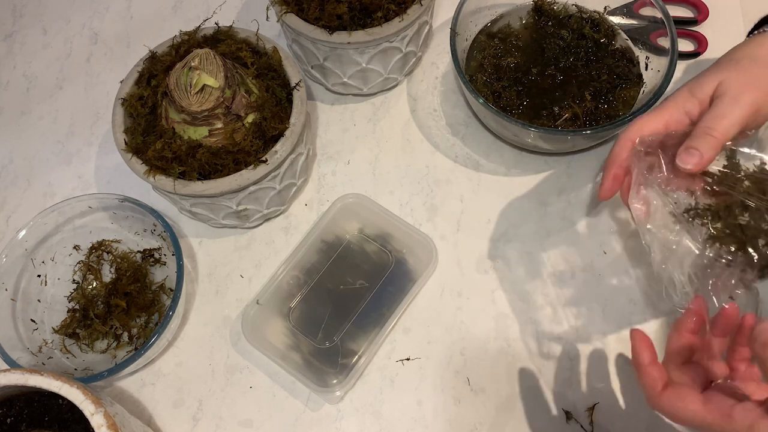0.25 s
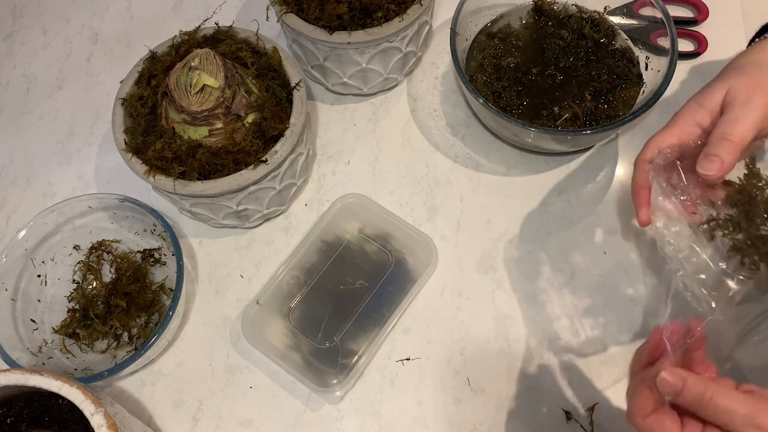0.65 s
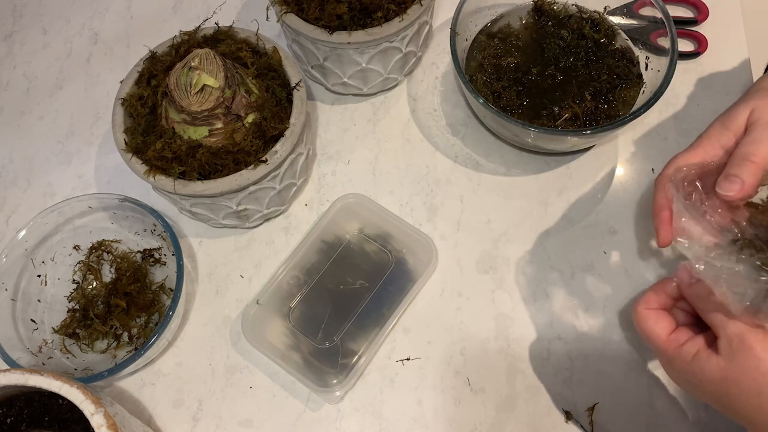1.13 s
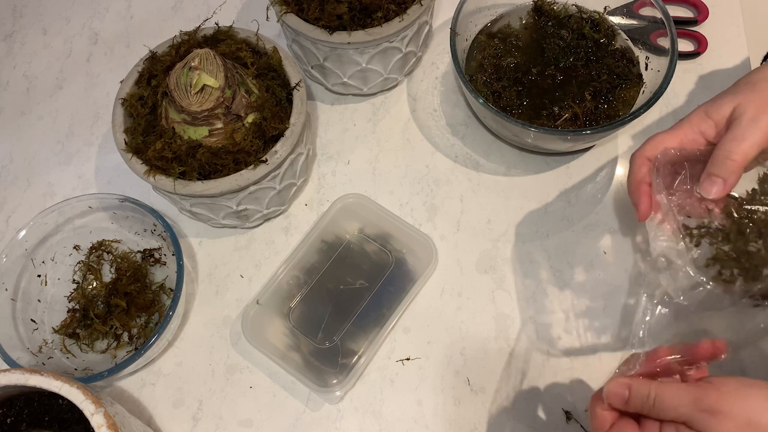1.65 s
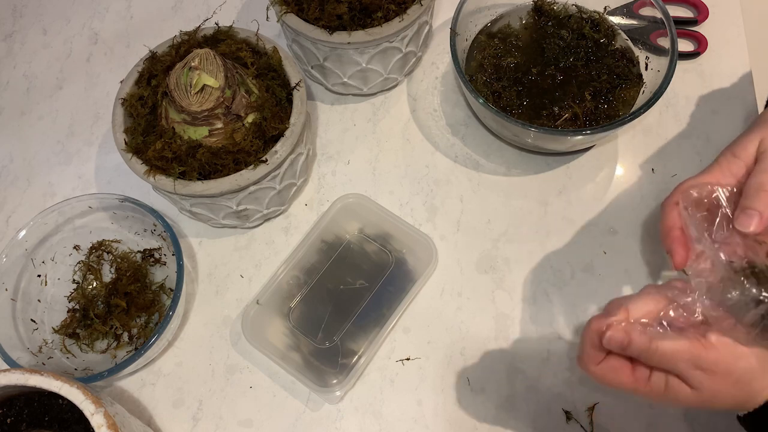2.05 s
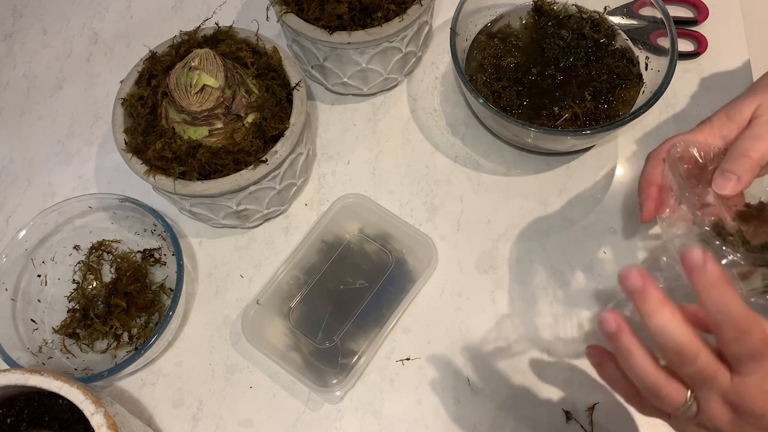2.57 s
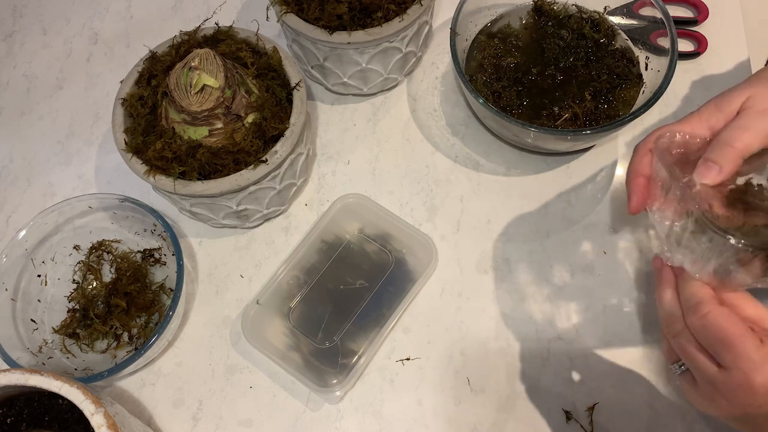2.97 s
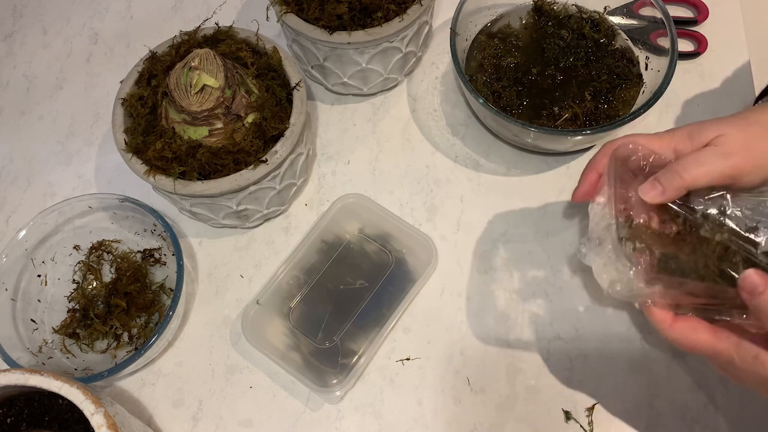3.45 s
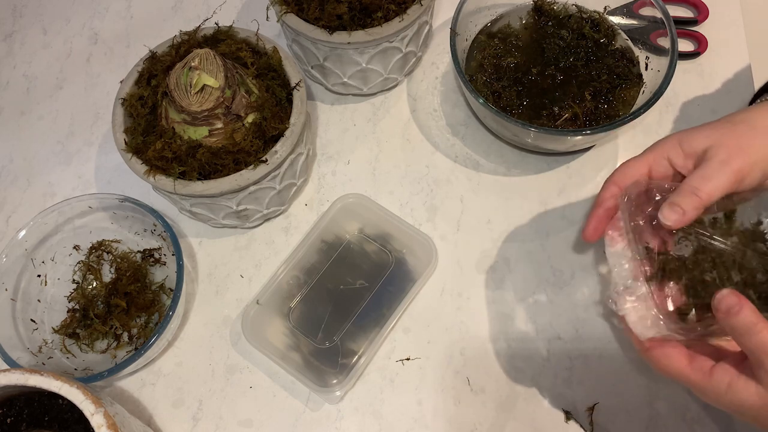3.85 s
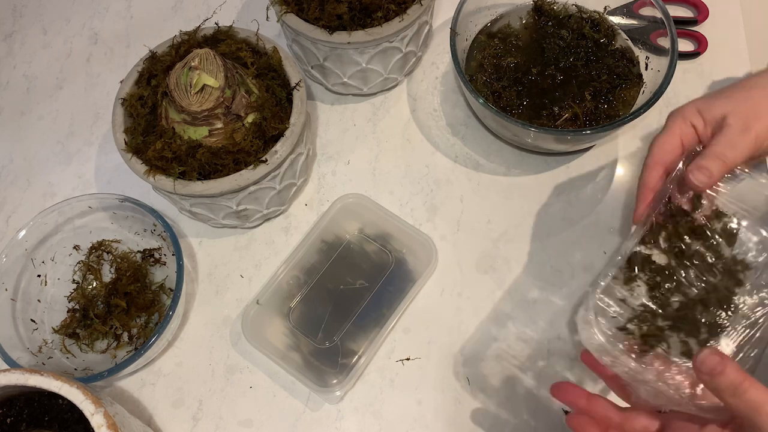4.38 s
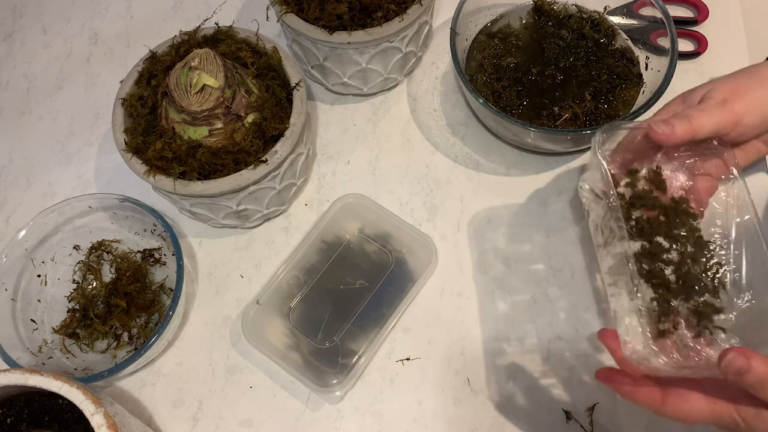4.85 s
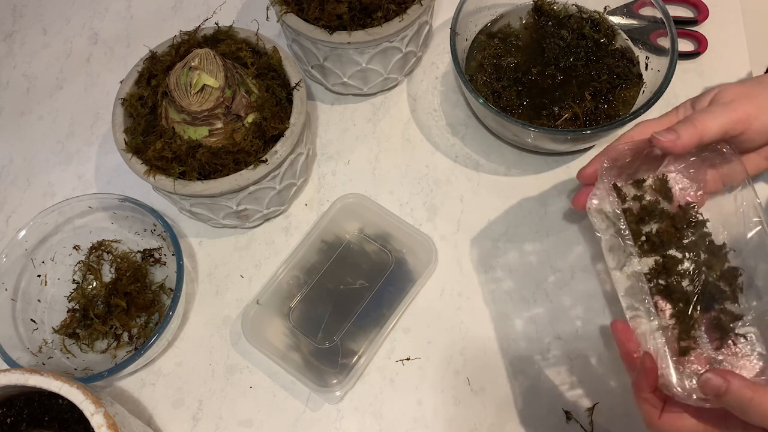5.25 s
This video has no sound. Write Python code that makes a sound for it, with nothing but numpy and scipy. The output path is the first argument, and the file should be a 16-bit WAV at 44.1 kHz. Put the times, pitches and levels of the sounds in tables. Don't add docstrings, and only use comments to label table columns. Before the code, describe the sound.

Hands stretch thin plastic film over a light plastic tub on a hard worktop. Fine crisp rustling comes in irregular tugs, with small snaps and ticks and an occasional pop. Firmer pops arrive near two seconds, then a brief lull around two and a half. From three and a half seconds loud hollow pops burst out in clusters to the end. Close microphone, small reflective room, faint low rumble.

```python
import sys
import numpy as np
from scipy import signal
from scipy.fft import rfft, irfft
from scipy.io import wavfile
from scipy.ndimage import uniform_filter1d

SR = 44100
rng = np.random.default_rng(int(sys.argv[2]) if len(sys.argv) > 2 else 0)


def gain_from_db(level_db):
    decades = np.asarray(level_db, float) / 20
    return 10 ** decades


def persist_wave(psi):
    counts = np.round(np.clip(psi, -1, 1) * 32767).astype(np.int16)
    wavfile.write(sys.argv[1], SR, np.atleast_2d(counts).T)


N = 243431

# start_s, peak_db, main_hz, second_hz, treble_slope_db_per_octave
HELD_POPS = [
    (0.995, -20, 5600, 1460, 1.5),
    (1.894, -20, 1450, 550, -3.5),
    (2.087, -15, 2110, 970, -3),
    (3.921, -14, 1660, 1150, 0.5),
    (4.242, -11, 763, 1560, -18.5),
    (4.344, -4, 2050, 3980, -1.8),
    (4.379, -8, 1450, 4300, 4),
    (4.573, -16, 1370, 2100, -11),
    (5.215, -6, 5200, 4080, 5),
    (5.378, -3, 5270, 780, 3),
]
FREE_POPS = [
    (0.11, -17.5, 1360, 5740, 5),
    (2.139, -14, 770, 1430, -27),
    (3.486, -1, 3350, 1870, -1.5),
    (4.846, -3, 1150, 2990, -0.5),
    (5.17, -5.5, 2670, 1680, 0),
]
# pitch_hz, width_hz, level_db
SHELL_MODES = [(540, 36, -4.5), (760, 22, -5.5), (2430, 30, 0), (3430, 200, -2), (4070, 35, -6),
               (4800, 40, -9), (5600, 35, -8.5), (7450, 40, -17)]
# start_s, peak_db, wall_hz, wall_db, treble_slope_db_per_octave
WALL_SNAPS = [(0.07, -36, 810, -19, 0), (0.124, -39, 1390, -8, 0), (0.622, -38.5, 354, -17.5, 0.6),
              (0.74, -39.5, 765, -14.5, 0.5), (1.352, -33, 925, -14, 3), (1.897, -25.5, 640, -9, -19),
              (2.151, -28, 734, -10.5, -19), (2.308, -39, 1510, -12.5, 1.5), (2.355, -47, 1420, -5.5, 11),
              (2.958, -45.5, 396, -10, 4), (3.161, -49, 1150, -5.5, 7.5), (3.227, -50, 720, 6, -1),
              (3.75, -41.5, 1120, -4.5, 6), (4.4, -37, 1180, 0, -1), (4.871, -16, 1083, -9.5, -1),
              (5.025, -38, 760, -5, -4), (3.489, -36, 700, 4, -8), (4.346, -33, 760, 4, -4),
              (5.287, -31.5, 780, -8.5, -7), (5.395, -31.5, 1840, -10, 4)]
# start_s, peak_db, crease_hz, treble_slope_db_per_octave
FOLD_SNAPS = [(0.135, -36.5, 5300, -2.5), (0.868, -39, 5960, 5.5), (0.944, -42, 5170, 0),
              (0.973, -40, 4370, 1), (1.016, -25.5, 4130, 0), (1.366, -39.5, 5050, 6),
              (1.457, -34, 2580, -3.5), (1.719, -54, 3750, -2), (2.642, -45.5, 3570, -5),
              (2.808, -41.5, 3600, -2), (2.864, -28, 6040, 5.5), (3.426, -45, 1790, -8.5),
              (3.723, -26, 3600, -5.5), (3.861, -29.5, 2470, 0.6), (5.184, -36, 1900, -13),
              (5.352, -20, 2240, -0.8), (5.403, -22, 6970, 4)]
# pitch_hz, level_db
CRACK_TONE = [(150, -31.5), (400, -7), (1000, 8.5), (3000, 4.5), (6000, 6), (10000, -0.5), (16000, -5.5)]
# pitch_hz, width_hz, level_db
TUB_MODES = [(292, 17, -15), (510, 104, 11.5), (700, 19, -20.5), (3490, 39, -9)]
# start_s, peak_db
FILM_TICKS = [(0.4735, -44), (0.4964, -45), (0.898, -36), (1.0894, -40), (1.155, -35.5), (1.2027, -35),
              (1.3244, -40), (1.4204, -35), (1.566, -34), (1.6924, -40), (1.8425, -35), (2.4277, -29),
              (2.9444, -32), (2.9944, -37), (3.345, -35), (4.231, -32), (4.306, -25), (4.4994, -38)]
# start_s, peak_db, pitch_hz
BASE_THUDS = [(0.653, -51, 388), (1.05, -52, 423), (1.39, -49.5, 322), (2.139, -51.5, 410),
              (3.737, -45, 274), (4.246, -32, 323), (4.848, -32.5, 316), (5.172, -33, 420)]
# tightest_s, build_up_s, fizz_db, crease_db
FILM_TUGS = [(0.01, 0.062, -58, -63.5), (.13, 0.055, -47.5, -62), (.41, 0.45, -67, -61),
             (.485, 0.14, -45, -57.5), (0.599, 0.12, -51.5, -63.5), (1.24, .2, -78, -73),
             (.87, 0.11, -48, -52.5), (1.02, 0.26, -43, -48), (1.09, 0.27, -48, -59),
             (1.358, 0.036, -45, -45), (1.455, 0.1, -40, -57.5), (1.58, 0.24, -52, -54.5),
             (1.7, 0.18, -48, -56.5), (2.1, 0.14, -55, -51), (2.37, 0.88, -58, -55),
             (2.645, .004, -48, -57.5), (2.74, 0.095, -48.5, -61), (2.82, 0.045, -51, -68),
             (2.87, 0.073, -37.5, -49.5), (3.19, 0.19, -54, -59.5), (3.35, 0.08, -65, -56.5),
             (3.6, 0.24, -53, -47), (3.75, 0.063, -47, -47), (4.1, 1, -68, -54.5), (4.3, 0.15, -51, -43.5),
             (4.39, .07, -42, -67), (4.62, 0.28, -58, -48.5), (4.87, 0.13, -47, -48),
             (5.2, 0.093, -47, -39.5), (5.42, 0.043, -43.5, -42)]
# pitch_hz, level_db
FIZZ_TONE = [(2500, -37), (5000, 22), (8000, 25.5), (12000, 26), (15000, 29.5), (17000, 14)]
# pitch_hz, level_db
CREASE_TONE = [(150, -17), (400, 4), (1000, -1.5), (2500, 1), (5000, -0.5), (8000, -5.5), (14000, -19)]
# delay_ms, level_db, side_share
WALL_ECHOES = [(11.3, -76, -0.34), (15.38, -15.5, 1), (16.3, -30.5, -1.98), (28.7, -13, -0.15)]
# pitch_hz, level_db
ECHO_TONE = [(300, -12), (1500, -6), (4000, -1), (8000, 1), (16000, 1)]
# pitch_hz, fade_s
ROOM_FADE = [(250, 0.31), (660, 0.39), (1740, 0.49), (4590, 0.38), (9000, 0.34), (15000, 0.22)]
# pitch_hz, level_db
ROOM_TONE = [(150, 11.5), (600, 1), (2000, 1), (6000, 1), (11000, -0.5), (16000, -9)]
# pitch_hz, level_db
STEREO_WIDTH = [(150, -25.5), (600, -10), (1500, -7), (4000, -9), (8000, -8), (10500, -4.5), (12500, -20),
                (16000, -30)]
# pitch_hz, level_db (per Hz)
RUMBLE_TONE = [(15, -38), (25, -17), (123, -1), (195, -1.5), (326, 2), (394, -7), (775, -6.5), (1230, -9),
               (1480, -7.5), (2550, -14.5), (3720, -13.5), (8360, -21), (16000, -19)]


def pop(peak_db, main_hz, second_hz, slope_db, main_db, second_db):
    push = slips(0.0017)
    hz = np.geomspace(100, 20000, num=400)
    modes = [(main_hz, 23, main_db), (second_hz, 23, second_db)]  # (pitch Hz, width Hz, dB)
    for f, width, level_db in SHELL_MODES:
        modes.append((f, width, level_db + slope_db * max(np.log2(f / 2000), 0)))
    crack_db = -8 + read(CRACK_TONE, hz) + slope_db * np.maximum(np.log2(hz / 3500), 0)
    near = colour(push, panel(modes, 0.055, crack_db - 4.5, hz), size=4096)
    far = colour(push, panel(modes, 0.17, crack_db + 2.0, hz), size=4096) * gain_from_db(-5.5)
    return gain_from_db(peak_db) * np.array([near, far]) / abs(near).max()


def panel(modes, spread, floor_db, hz):
    power = gain_from_db(floor_db) ** 2
    for centre, width, db in modes:
        off = (hz / centre - centre / hz) * centre / (width + spread * centre)
        power = power + gain_from_db(db) ** 2 / (1 + off ** 2) / (1 + (off * spread / 0.83) ** 4)
    return np.transpose([hz, 10 * np.log10(power)])


def snap(peak_db, wall_hz, crease_hz, wall_db, slope_db):
    push = slips(0.0033)
    wall = ring(push, wall_hz, 0.14 * wall_hz)
    wall = peaked(ring(wall, wall_hz, 1.36 * wall_hz))
    crease = peaked(ring(push, crease_hz, 0.25 * crease_hz))
    sharp = gain_from_db(2.5) * peaked(crack(push)) + gain_from_db(-9) * crease
    sharp = colour(sharp, [(3500, 0), (14000, 2 * slope_db)])
    return gain_from_db(peak_db) * (sharp + gain_from_db(wall_db + 7.5) * wall)


def crack(push):
    plain = colour(push, CRACK_TONE)
    hollow = sum(gain_from_db(db) * ring(plain, hz, width) for hz, width, db in TUB_MODES)
    return plain + hollow


def slips(length_s):
    chance = rng.standard_normal(2000)
    t = np.arange(len(chance)) / SR
    burst = chance * abs(chance) * (1 - np.exp(-t / 0.0011)) * np.exp(-t / length_s)
    spectrum = rfft(burst)
    flat = irfft(spectrum / abs(spectrum) ** 0.65, len(t))
    return flat * np.minimum(t / 0.00024, 1) * np.exp(-(t / (4 * length_s)) ** 2)


def tick(peak_db):
    return gain_from_db(peak_db - 6) * peaked(colour(slips(0.00053), FIZZ_TONE))


def thud(peak_db, pitch_hz):
    t = np.arange(2000) / SR
    swell = (1 - np.exp(-t / 0.0016)) * np.exp(-t / 0.026)
    return gain_from_db(peak_db - 7.5) * peaked(swell * np.sin(2 * np.pi * pitch_hz * t))


def single_events():
    out = np.zeros((2, N + 2000))

    def add(start_s, sound):
        out[:, round(start_s * SR):][:, :2000] += sound

    for start_s, *row in HELD_POPS:
        add(start_s, pop(*row, main_db=8.5, second_db=4.5))
    for start_s, *row in FREE_POPS:
        add(start_s, pop(*row, main_db=12.5, second_db=5.5))
    for start_s, peak_db in FILM_TICKS:
        add(start_s, tick(peak_db))
    for start_s, peak_db, wall_hz, wall_db, slope_db in WALL_SNAPS:
        add(start_s, snap(peak_db, wall_hz, 3350, wall_db, slope_db))
    for start_s, peak_db, crease_hz, slope_db in FOLD_SNAPS:
        add(start_s, snap(peak_db, 1150, crease_hz, -56.5, slope_db))
    for start_s, *row in BASE_THUDS:
        add(start_s, thud(*row))
    return out[:, :N]


def rustle():
    _, _, fizz_db, crease_db = np.transpose(FILM_TUGS)
    fizz = evened(colour(cracks(7400, 2.4, 2.9), FIZZ_TONE))
    fizz = fizz * tension(fizz_db - 2.5, fall_db_per_s=287, idle_db=-68)
    crease = evened(colour(cracks(4000, 3.9, 2.1), CREASE_TONE))
    crease = crease * tension(crease_db, fall_db_per_s=165, idle_db=-70.5)
    return fizz + crease


def cracks(per_s, spread_db, clump_db):
    happens = rng.random(N) < per_s / SR
    size = np.minimum(rng.exponential(1, N), 5)
    sign = rng.choice([-1., 1.], N)
    clump = uniform_filter1d(rng.standard_normal(N), 150)
    clump = evened(uniform_filter1d(clump, 150))
    return happens * sign * gain_from_db(spread_db * size + clump_db * clump)


def tension(peak_db, fall_db_per_s, idle_db):
    tightest_s, build_s = np.transpose(FILM_TUGS)[:2, :, None]
    t = np.arange(0, N, 32) / SR
    build_drop_db = 22 * (tightest_s - t) / np.maximum(build_s, 0.003)
    drop_db = np.maximum(build_drop_db, fall_db_per_s * (t - tightest_s))
    tugs = (gain_from_db(peak_db[:, None] - drop_db) ** 2).sum(axis=0)
    resting = (t < 2.47) | (t > 2.64)
    power = tugs + gain_from_db(idle_db) ** 2 * resting
    return np.interp(np.arange(N) / SR, t, np.sqrt(power))


def echoes(x):
    early = np.zeros((2, 2048))
    # 5.9 ms, -3 dB, straight ahead
    for delay_ms, level_db, side_share in [(5.9, -3, 0), *WALL_ECHOES]:
        early[:, round(delay_ms * SR / 1000)] += gain_from_db(level_db) * np.array([1, side_share])
    return np.array([signal.oaconvolve(x, colour(e, ECHO_TONE))[:N] for e in early])


def room(x, count=4):
    turn = np.pi * 9.3 * np.arange(N) / SR
    answer = np.zeros((2, N))
    for k in range(count):
        share = np.sqrt(2 / count) * np.cos(turn + np.pi * k / count)
        answer += signal.fftconvolve((x * share)[None], tail(), axes=1)[:, :N]
    return answer


def tail():
    noise = rng.standard_normal((2, SR * 3 // 4))
    hz, t, z = signal.stft(noise, SR, nperseg=256, noverlap=192)
    fade_s = read(ROOM_FADE, hz)[:, None]
    side_db = np.array([0 * hz, read(STEREO_WIDTH, hz)])[:, :, None]
    level_db = read(ROOM_TONE, hz)[:, None] - 60 * t / fade_s + side_db
    z = z * gain_from_db(level_db) / np.sqrt(fade_s * SR / 10.2)
    decay = signal.istft(z, SR, nperseg=256, noverlap=192)[1]
    t = np.arange(decay.shape[1]) / SR
    rise_s = np.array([[0.005], [0.012]])
    return decay * (1 - np.exp(-(t / rise_s) ** 2))


def rumble():
    frames, hz = N // 512 + 5, np.fft.rfftfreq(2048, 1 / SR)
    a, b, c, d, patches = rng.standard_normal((frames, 1025, 5)).T
    patches = uniform_filter1d(patches, 10, 0)
    patches = evened(uniform_filter1d(patches, 8, 1))
    side_gain = gain_from_db(read(STEREO_WIDTH, hz) + 3)[:, None]
    z = np.array([a + 1j * b, (c + 1j * d) * side_gain])
    z *= gain_from_db(read(RUMBLE_TONE, hz)[:, None] + 2.8 * patches)
    noise = signal.istft(z, nperseg=2048, noverlap=1536)[1][:, :N]
    return gain_from_db(-59) * evened(noise)


def ring(x, hz, width):
    r = np.exp(-np.pi * width / SR)
    push = np.array([1, 0, -1]) * (1 - r * r) / 2
    return signal.lfilter(push, [1, -2 * r * np.cos(2 * np.pi * hz / SR), r * r], x)


def colour(x, points, size=1024):
    log_gain = np.log(gain_from_db(read(points, abs(np.fft.fftfreq(size, 1 / SR)))))
    taps = np.fft.ifft(np.exp(log_gain - 1j * signal.hilbert(log_gain).imag)).real
    return signal.oaconvolve(x, taps[:size // 2])[:len(x)]


def read(points, hz):
    f, value = np.transpose(points)
    return np.interp(np.log(hz + 1), np.log(f + 1), value)


def evened(x):
    return x / np.sqrt(np.mean(x ** 2) + 1e-20)


def peaked(x):
    return x / abs(x).max()


def scene():
    near, far = single_events()
    film = rustle()
    mid, side = echoes(near) + room(far + film)
    mid = mid + near + film
    side = side - 0.058 * mid
    mid, side = np.array([mid, side]) + rumble()
    return np.array([mid + side, mid - side])


def band_limit(x):
    return signal.sosfilt(signal.butter(12, 16810, fs=SR, output="sos"), x)


def record(dry):
    heard = np.array([colour(c, [(13000, 0), (15500, -7), (16500, -34)]) for c in dry])
    return band_limit(heard)


dry = scene()
out = record(dry)
persist_wave(out)
```